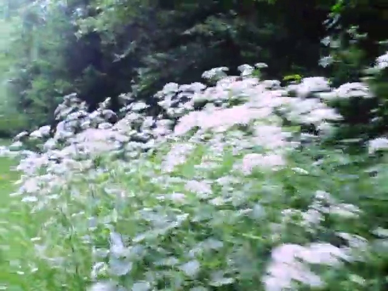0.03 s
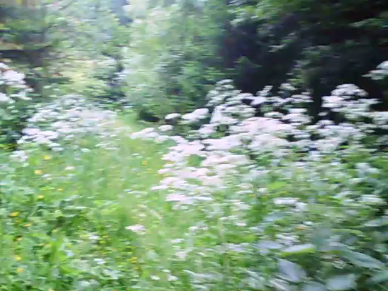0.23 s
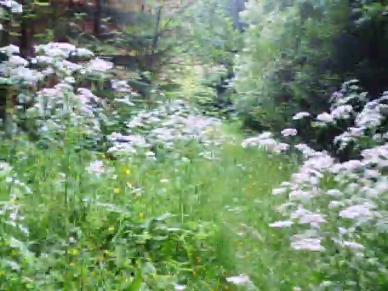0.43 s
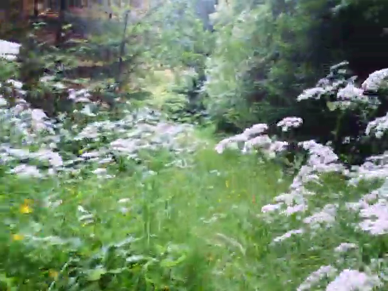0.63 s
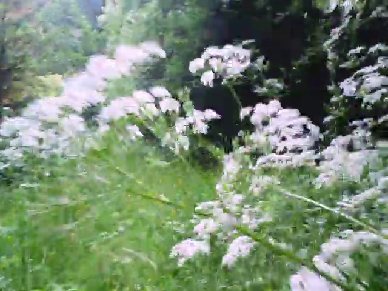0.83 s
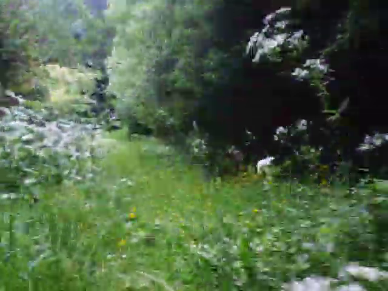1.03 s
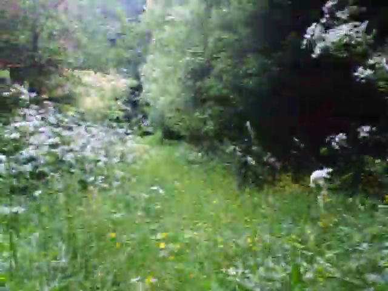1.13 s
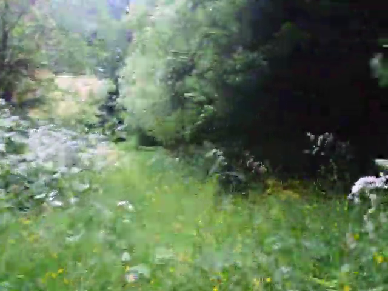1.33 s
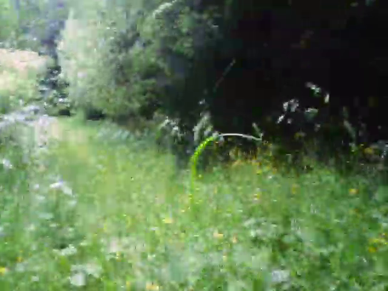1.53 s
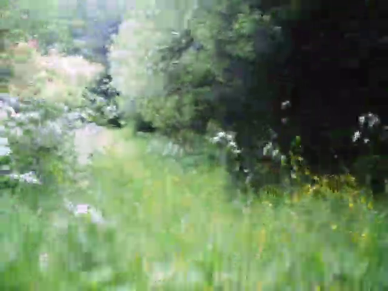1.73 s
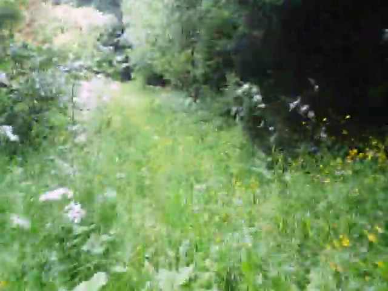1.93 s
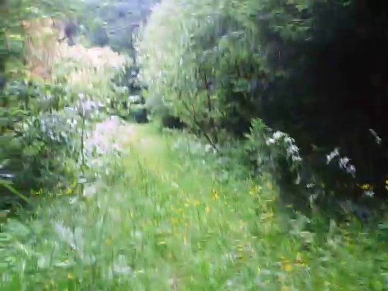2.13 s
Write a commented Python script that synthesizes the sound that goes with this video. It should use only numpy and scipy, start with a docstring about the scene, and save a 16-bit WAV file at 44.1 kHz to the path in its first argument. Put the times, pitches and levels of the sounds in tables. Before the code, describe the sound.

A bicycle rolls over bumpy grass, thudding and clacking, with wind rumbling on the microphone.

```python
"""On a bumpy grass path, a bicycle rolls along with a camera on board. Wind rumbles on the microphone,
the wheels thud over the ground and grass brushes by, above the camera's own hiss and thin whine.
A loose plastic part clacks and buzzes at the bumps, and the big ones heave the camera.
A plant stem scrapes past once in quick catches and slips; later a wheel rubs faintly."""
import sys
import numpy as np
from scipy import signal
from scipy.fft import rfft, irfft, next_fast_len
from scipy.io import wavfile
from scipy.ndimage import uniform_filter1d

SR = 44100
rng = np.random.default_rng(int(sys.argv[2]) if len(sys.argv) > 2 else 0)


def store_pcm(level_fs):
    """Save levels as 16-bit WAV."""
    pcm = np.round(np.clip(level_fs, -1, 1) * 32767).astype(np.int16)
    wavfile.write(sys.argv[1], SR, np.atleast_2d(pcm).T)


N = 97020
T = np.arange(N) / SR


def amp(db):
    """Decibels to gain."""
    return 10 ** (np.asarray(db) / 20)


def unit(x):
    """Scale to rms 1."""
    return x / np.sqrt(np.mean(x ** 2) + 1e-20)


def fader(points):
    """Gain per sample from (time [s], level [dB]) points."""
    return amp(np.interp(T, *np.transpose(points)))


def eq_curve(points, hz):
    """Gain at hz from (frequency [Hz], level [dB]) points on a log axis."""
    point_hz, db = np.transpose(points)
    return amp(np.interp(np.log(hz + 1), np.log(point_hz + 1), db))


def filtered(x, response):
    """Filter x by a gain that is a function of frequency."""
    size = next_fast_len(N + SR // 2)
    return irfft(rfft(x, size) * response(np.fft.rfftfreq(size, 1 / SR)), size)[:N]


def coloured(x, eq):
    """x through an EQ curve, at rms 1."""
    return unit(filtered(x, lambda hz: eq_curve(eq, hz)))


def even_noise(eq, window_s):
    """Coloured noise whose chance swells slower than the window are evened out."""
    noise = coloured(rng.standard_normal(N), eq)
    power = uniform_filter1d(np.abs(signal.hilbert(noise)) ** 2, int(window_s * SR) + 1)
    return unit(noise / np.sqrt(np.abs(power) + 1e-9))


def grains(per_s, spread_db=3):
    """Random tiny impulses of uneven size."""
    impulses = (rng.random(N) < per_s / SR) * np.sign(rng.standard_normal(N))
    return impulses * amp(spread_db * np.clip(rng.standard_normal(N), -2, 2))


def snap(eq, size=1024):
    """A causal pulse of peak 1 with the given spectrum."""
    cepstrum = irfft(np.log(eq_curve(eq, np.fft.rfftfreq(size, 1 / SR))))
    pulse = irfft(np.exp(rfft(2 * cepstrum[:size // 2], size)))
    return pulse / np.abs(pulse).max()


def stroke(start, length, attack_s, t60_s):
    """An envelope: attack, hold and release."""
    attack = np.clip((T - start) / attack_s, 0, 1)
    return attack * amp(-60 * np.maximum(T - start - length, 0) / t60_s)


# the ride of the gusts (time [s], relative level [dB])
GUSTS = [(0, -35), (.1, -43), (.15, -49.5), (.22, -38), (.3, -46), (.38, -31), (.45, -42), (.52, -36.5),
         (.75, -36.5), (.82, -37.5), (.87, -33.5), (.93, -40.5), (1.08, -32.5), (1.15, -44.5), (1.25, -31),
         (1.33, -34.5), (1.5, -42.5), (1.58, -34), (1.65, -41), (1.72, -43.5), (1.86, -47), (1.93, -45),
         (1.99, -35.5), (2.05, -50.5), (2.2, -35)]
# sub-heavy rumble (frequency [Hz], level [dB])
WIND_EQ = [(8, -7), (20, -3.5), (32, -3), (45, -3.5), (58, -14), (72, -25.5), (120, -33), (400, -67),
           (1500, -110)]


def wind():
    """Gusts buffet the microphone with a low rumble."""
    return amp(1) * fader(GUSTS) * even_noise(WIND_EQ, window_s=0.045)


# how hard the ground shakes the bicycle (time [s], relative level [dB])
GROUND_SHAKE = [(0, -59.5), (.15, -72), (.25, -65.5), (.38, -59), (.48, -61.5), (.54, -62.5), (.6, -59),
                (.72, -52.5), (.76, -49), (.84, -51.5), (.88, -51), (1.03, -53), (1.07, -42), (1.12, -43),
                (1.19, -56.5), (1.235, -45), (1.3, -41), (1.35, -52), (1.46, -58.5), (1.52, -57.5),
                (1.55, -45), (1.59, -40.5), (1.62, -55.5), (1.665, -45), (1.7, -63.5), (1.8, -68.5),
                (1.88, -62), (1.95, -43.5), (2.0, -58.5), (2.13, -63), (2.17, -47), (2.2, -58)]
# bassy thud (frequency [Hz], level [dB])
THUD_EQ = [(40, -19), (80, -1), (120, -2.5), (160, 3), (195, -5), (240, -4), (310, -16.5), (420, -25.5),
           (600, -35), (1000, -41), (3000, -70)]
# low-mid rolling drone (frequency [Hz], level [dB])
DRONE_EQ = [(60, -7), (150, -17), (230, 1), (300, 5.5), (360, -6), (450, -13.5), (700, -21.5), (2000, -58)]


def wheels():
    """The wheels roll with a steady drone and thud over uneven ground."""
    drone = amp(-66) * coloured(rng.standard_normal(N), DRONE_EQ)
    thuds = amp(1) * fader(GROUND_SHAKE) * even_noise(THUD_EQ, window_s=0.03)
    return drone + thuds


# swishes of grass (time [s], level [dB])
SWISHES = [(0, -81), (.3, -74), (.6, -67), (.73, -74), (.79, -53.5), (.82, -66), (.92, -72.5), (1.0, -63),
           (1.07, -63.5), (1.17, -69), (1.19, -62), (1.22, -52), (1.25, -57.5), (1.29, -61), (1.38, -66),
           (1.51, -72), (1.55, -54.5), (1.6, -63.5), (1.68, -75), (1.88, -79), (1.94, -66.5), (2.03, -78),
           (2.2, -72)]
# soft body with a papery peak (frequency [Hz], level [dB])
GRASS_EQ = [(200, 14), (500, -1.5), (800, -10), (1050, -2.5), (1350, 1), (1700, -1), (1880, -4), (2150, 8),
            (2650, -10.5), (3200, -9), (4200, -14.5), (10000, -34)]


def grass():
    """Grass brushes the bicycle: a soft swish with sparse little ticks in it."""
    brush = coloured(rng.standard_normal(N), GRASS_EQ)
    chatter = coloured(grains(per_s=160), GRASS_EQ)
    return fader(SWISHES) * unit(brush + amp(1.5) * chatter)


# broad, flat hiss (frequency [Hz], level [dB])
HISS_EQ = [(100, -15.5), (600, 0.5), (2000, -1), (4000, -2.5), (7000, -1.5), (9500, -2.5), (10700, -7),
           (11400, -14.5), (12000, -28)]
# thin whine (frequency [Hz], rms level [dB])
WHINE_TONES = [(4048, -86), (5599, -85), (7400, -86.5), (9599, -88)]


def camera():
    """The camera's electronics lay down a steady bed of hiss and high tones."""
    hiss = amp(-69.5) * coloured(rng.standard_normal(N), HISS_EQ)
    whine = sum(amp(db) * np.sqrt(2) * np.sin(2 * np.pi * hz * T) for hz, db in WHINE_TONES)
    return hiss + whine


# soft knocks of the wheels on the ground (time [s], peak level [dB])
WHEEL_HITS = [(0.246, -54), (0.525, -40), (0.663, -50), (0.8359, -44), (0.866, -43), (0.966, -42.5),
              (1.031, -38), (1.066, -33), (1.232, -28.5), (1.554, -34.5), (1.582, -38), (1.728, -48),
              (2.105, -51.5)]
# the frame's dull ring (frequency [Hz], relative level [dB], t60 [s])
FRAME_MODES = [(153.6, 4, 0.099), (233.7, 1, 0.086), (352, -6, 0.043), (508, -18, 0.028), (812, -15, 0.023)]


def knocks():
    """A wheel hits the ground and the frame rings, a little differently each time."""
    out, t = np.zeros(N + SR), np.arange(SR // 8) / SR
    for start, peak_db in WHEEL_HITS:
        ring = np.zeros(len(t))
        for k, (hz, db, t60) in enumerate(FRAME_MODES):
            decay = amp(db + rng.normal(0, 3) - 60 * t / t60)
            ring += (-1) ** k * decay * np.sin(2 * np.pi * hz * t)
        out[round(start * SR):][:len(t)] += amp(peak_db) * ring / np.abs(ring).max()
    return out[:N]


# hits of the loose part (time [s], ring peak level [dB], tick over ring [dB])
PART_HITS = [(.377, -52, -14), (.404, -54, -12), (.686, -54, -17), (.7525, -32.5, 0.5), (.8362, -40.5, -22),
             (.8388, -39, -26), (.867, -52.5, -18), (1.062, -57, -17), (1.073, -47.5, -10),
             (1.103, -53, -14), (1.2324, -28, 0), (1.2381, -32, -2), (1.274, -48, 4), (1.296, -51, -2),
             (1.323, -50, -9), (1.350, -42.5, -24), (1.356, -52, -8), (1.406, -44.5, -5), (1.564, -46, -4),
             (1.583, -36.5, -37), (1.594, -52, -18), (1.646, -51, -6), (1.7261, -53, -34),
             (1.728, -39.5, -10), (1.9665, -53.5, -22), (2.1075, -55, -23), (2.157, -57, -21)]
# its short, woody ring (frequency [Hz], relative level [dB], t60 [s])
PART_MODES = [(690, -4, .011), (1200, -4.5, 0.014), (1692, -4, 0.02), (2089, 4.5, 0.017),
              (2240, -16.5, 0.0079), (3180, -7, 0.0099)]
# mid-forward contact tick (frequency [Hz], level [dB])
TICK_EQ = [(200, -19.5), (1000, 6), (3000, 0.5), (5000, -12), (8000, -21), (11000, -26), (12500, -39)]


def clacks(ring_attack_s=0.00013, ring_top_hz=3800, scatter_db=3.5, tick_t60_s=0.0062):
    """The loose plastic part strikes: each contact is a sharp tick and a very short ring."""
    out, t = np.zeros(N + SR), np.arange(SR // 16) / SR
    hz, db, t60 = np.transpose(PART_MODES)[:, :, None]
    pulse = snap(TICK_EQ)
    lowpass = signal.butter(4, ring_top_hz, fs=SR, output="sos")
    for start, peak_db, tick_db in PART_HITS:
        scatter = scatter_db * rng.standard_normal(hz.shape)
        modes = amp(db + scatter - 60 * t / t60) * np.sin(2 * np.pi * hz * t)
        ring = signal.sosfilt(lowpass, modes.sum(0) * (1 - np.exp(-t / ring_attack_s)))
        grit = 0.25 * rng.standard_normal(len(t)) * amp(-60 * t / tick_t60_s)
        tick = signal.fftconvolve(signal.unit_impulse(len(t)) + grit, pulse)[:len(t)]
        clack = ring / np.abs(ring).max() + amp(tick_db) * tick
        out[round(start * SR):][:len(t)] -= amp(peak_db) * clack
    return out[:N]


# strokes of the stem (time [s], length [s], hollow level [dB], grit over hollow [dB])
STEM_STROKES = [(0.744, 0.0025, -58.5, -20), (0.747, 0.0015, -46, -11), (0.751, 0.0061, -44, -16),
                (0.7588, 0.0071, -39.5, -4), (0.767, 0.0029, -44, -0.5), (0.771, 0.0056, -57, -32),
                (.7785, 0.0034, -48.5, -4), (.789, 0.011, -57, -20)]
# hollow body of the scrape (frequency [Hz], level [dB])
HOLLOW_EQ = [(100, 4.5), (400, 7.5), (560, -17), (720, -4), (850, -20), (1100, 4), (1350, -5), (1650, 1),
             (2100, -0.5), (2550, -4), (3150, 5.5), (3900, -21), (5500, -16), (11000, -45)]
# its gritty top (frequency [Hz], level [dB])
GRIT_EQ = [(1000, -25), (3000, 1), (4200, 0.5), (5500, 0.5), (6800, -7.5), (8000, -11), (11000, -22.5),
           (12000, -41)]


def stem(slips_per_s=6500):
    """A stem catches and slips in a few quick strokes: hollow at first, gritty as it tears free."""
    hollow = coloured(grains(slips_per_s), HOLLOW_EQ)
    grit = coloured(grains(slips_per_s), GRIT_EQ)
    out = np.zeros(N)
    for start, length, db, grit_db in STEM_STROKES:
        envelope = amp(db) * stroke(start, length, attack_s=0.00036, t60_s=0.0051)
        out += envelope * (hollow + amp(grit_db) * grit)
    return out


# light buzzes of the loose part (time [s], length [s], level [dB])
BUZZ_BURSTS = [(1.195, 0.025, -55.5), (1.525, 0.012, -61)]
# nasal plastic tone (frequency [Hz], level [dB])
BUZZ_EQ = [(300, -36), (1100, -4), (1700, 3.5), (1900, -5), (2200, 5), (2550, -5), (2900, -15), (4000, -24),
           (8000, -41)]


def buzz():
    """As a bump builds, the loose part chatters in a flurry of tiny contacts."""
    swell = sum(amp(db) * stroke(start, length, attack_s=0.0043, t60_s=0.07)
                for start, length, db in BUZZ_BURSTS)
    return swell * coloured(grains(per_s=1400), BUZZ_EQ)


# big bumps (centre time [s], pitch [Hz], width [s], envelope peak [dB])
BIG_BUMPS = [(1.236, 26.9, .015, -14), (1.549, 86.4, 0.015, -31), (1.575, 34.4, 0.022, -30)]


def heave():
    """Each big bump pushes the camera to and fro: a short, deep thump."""
    out = np.zeros(N)
    for centre, hz, width, db in BIG_BUMPS:
        swell = amp(db) * np.exp(-((T - centre) / width) ** 2)
        out -= swell * np.sin(2 * np.pi * hz * (T - centre))
    return out


# one faint swell of friction (time [s], level [dB])
RUB_SWELL = [(1.37, -90), (1.42, -71), (1.47, -71.5), (1.53, -80.5), (1.58, -93)]


def rub(centre_hz=1600, half_width_hz=150):
    """A wheel rubs briefly: a narrow-band whisper."""
    noise = rng.standard_normal(N)
    whisper = filtered(noise, lambda hz: 1 / (1 + ((hz - centre_hz) / half_width_hz) ** 4))
    return fader(RUB_SWELL) * unit(whisper)


def scene():
    """The mono mix, close and dry in the open air."""
    low_end = wind() + heave() + knocks() + wheels()
    textures = clacks() + buzz() + stem() + grass() + rub()
    return (low_end + textures + camera())[None]


def record(dry, top_hz=11960):
    """The camera keeps nothing above its band limit."""
    return filtered(dry[0], lambda hz: hz < top_hz)[None]


dry = scene()
out = record(dry)
store_pcm(out)
```